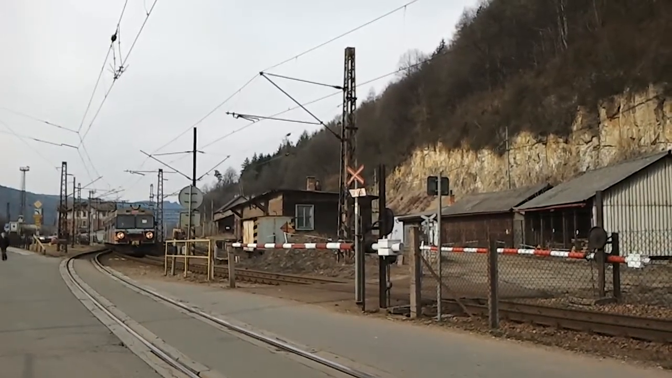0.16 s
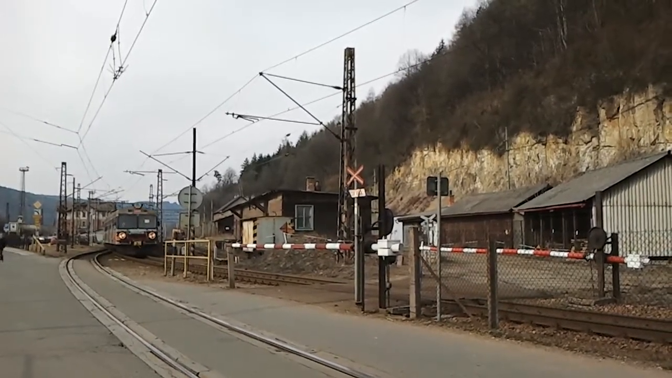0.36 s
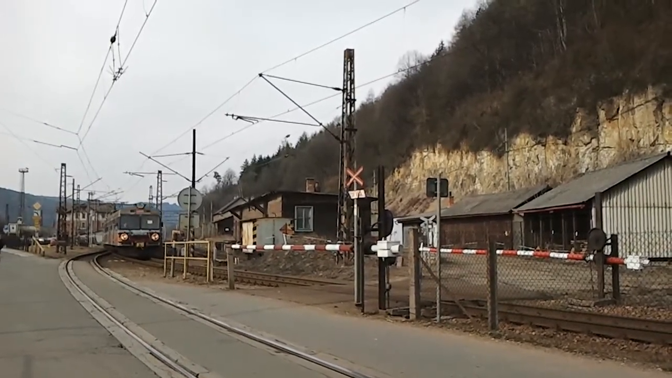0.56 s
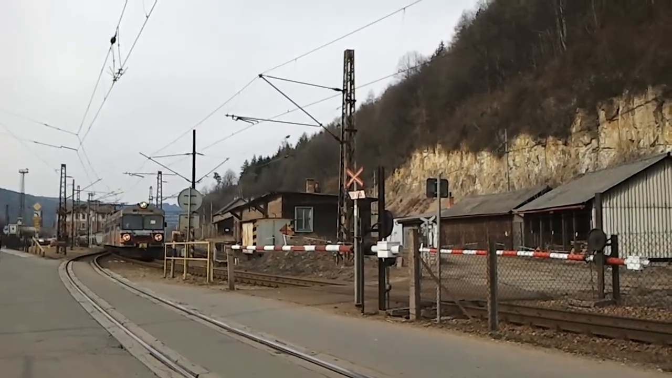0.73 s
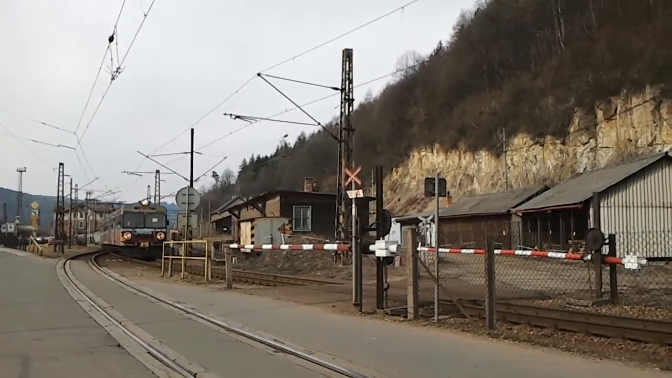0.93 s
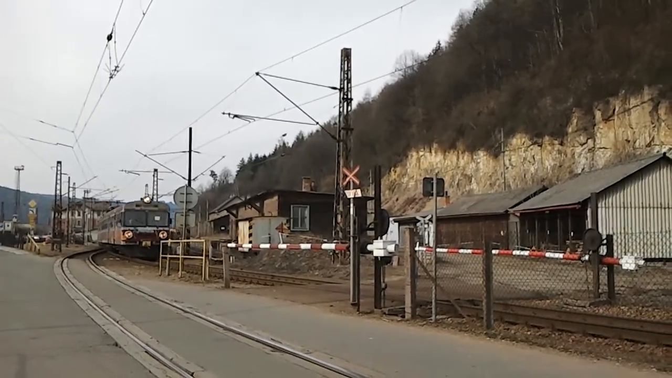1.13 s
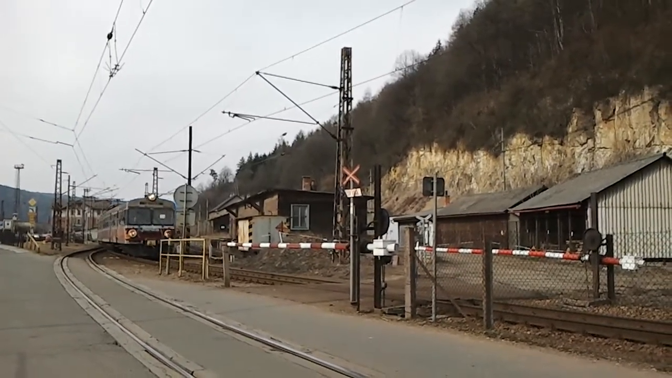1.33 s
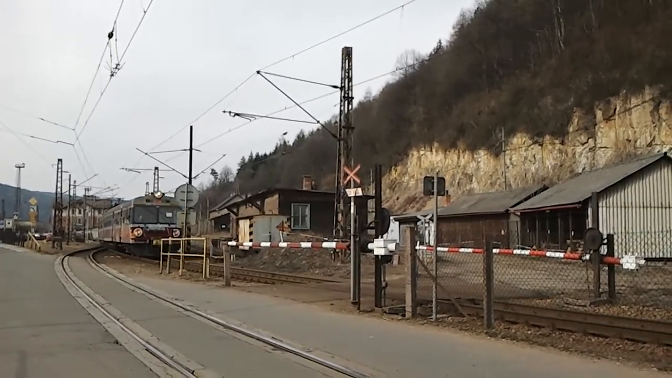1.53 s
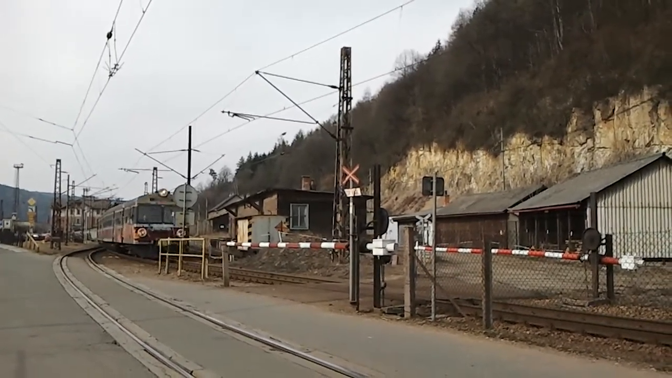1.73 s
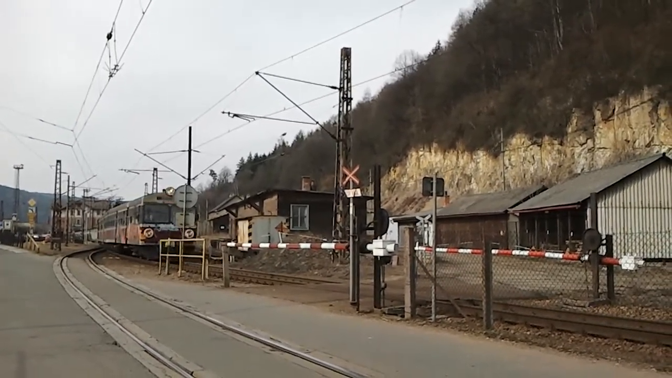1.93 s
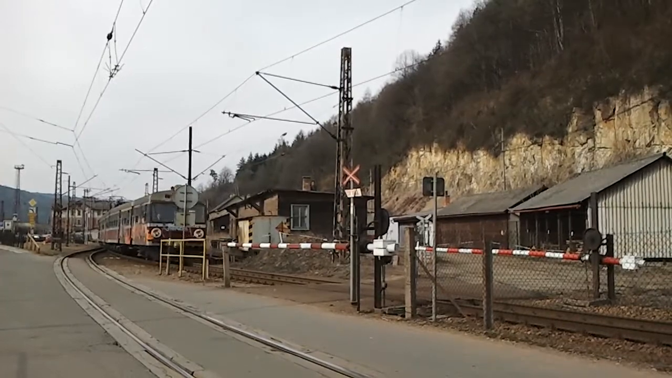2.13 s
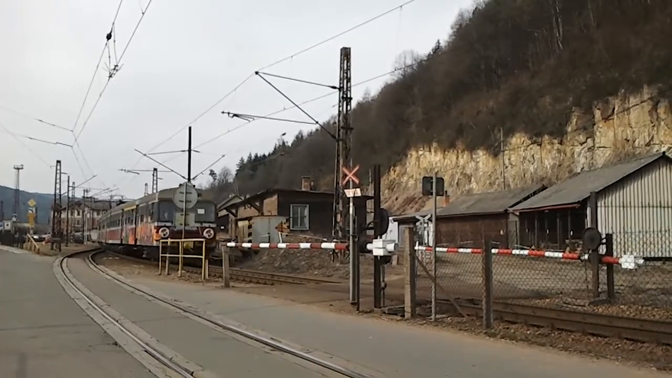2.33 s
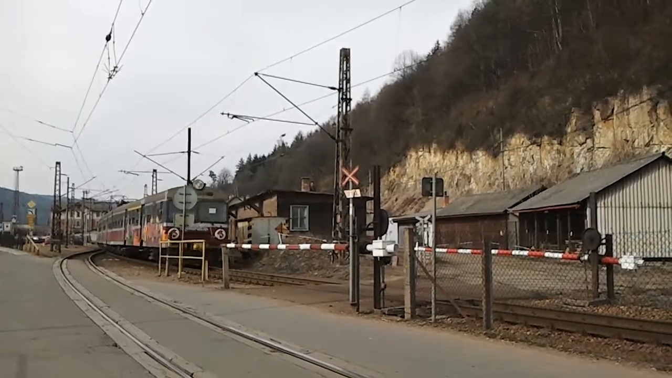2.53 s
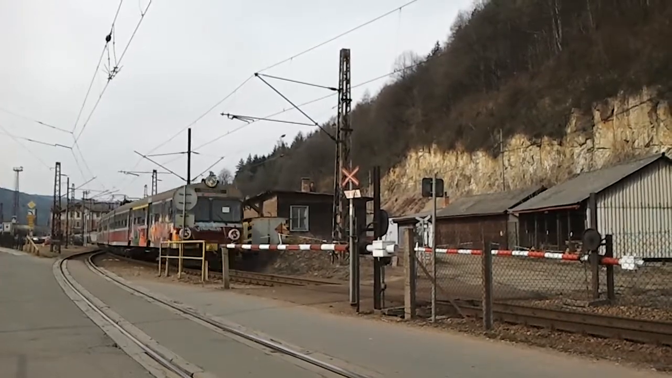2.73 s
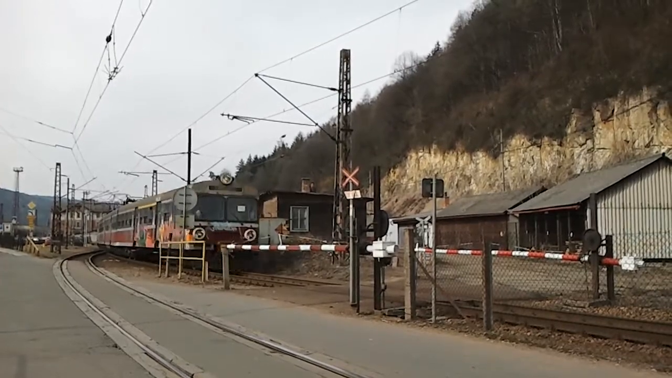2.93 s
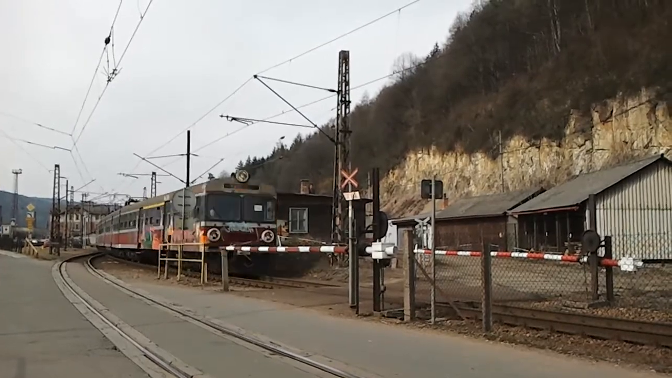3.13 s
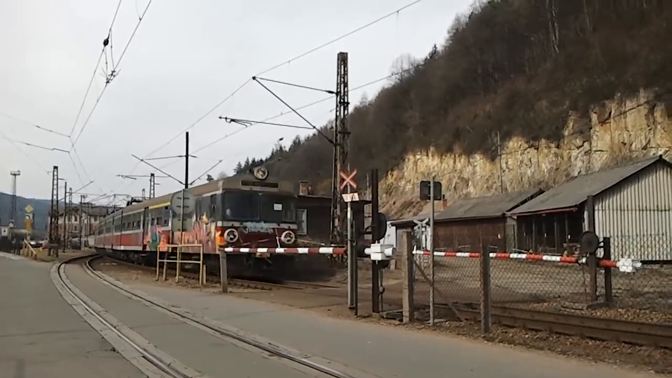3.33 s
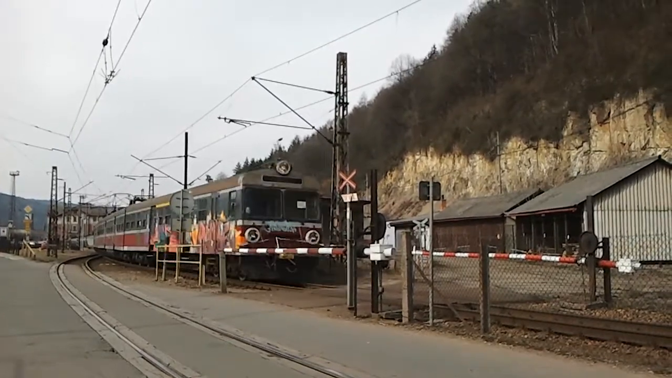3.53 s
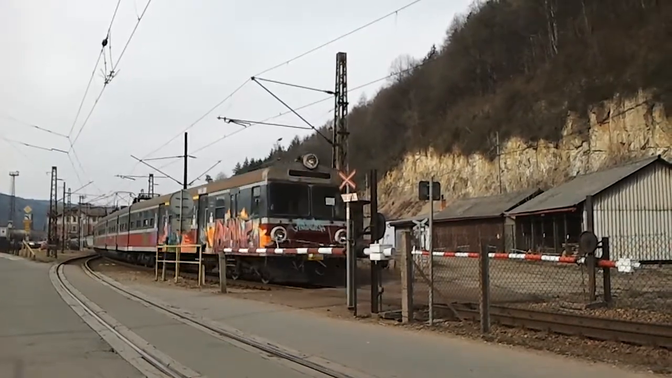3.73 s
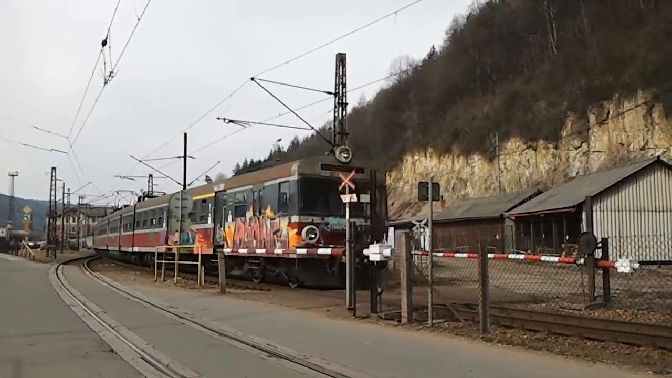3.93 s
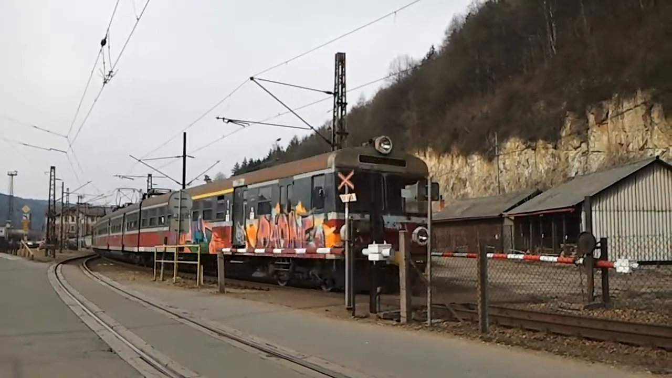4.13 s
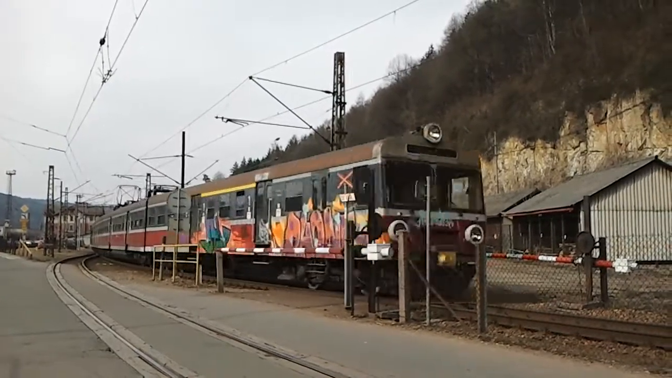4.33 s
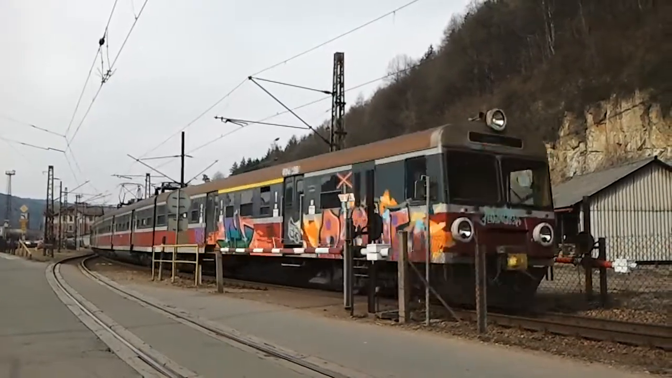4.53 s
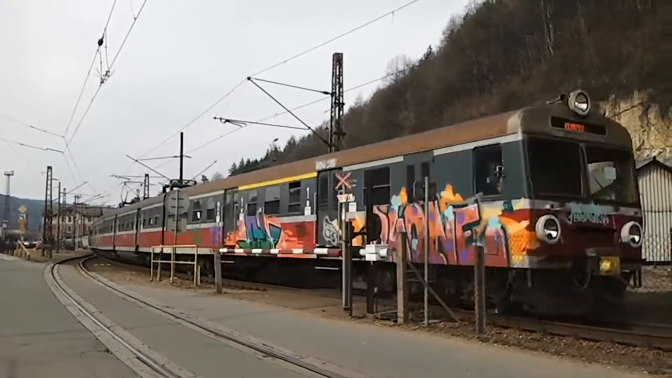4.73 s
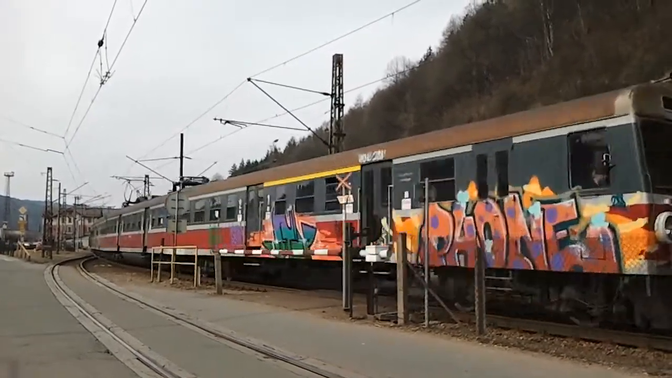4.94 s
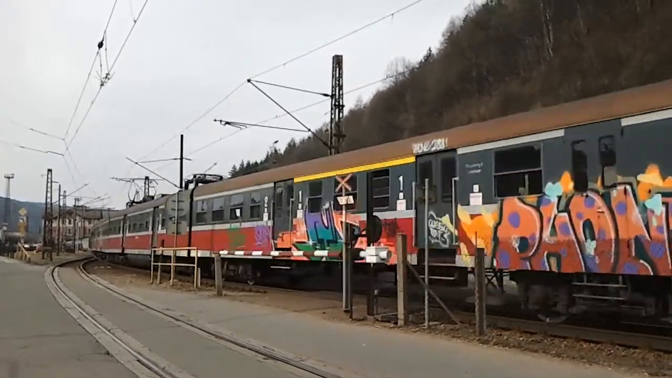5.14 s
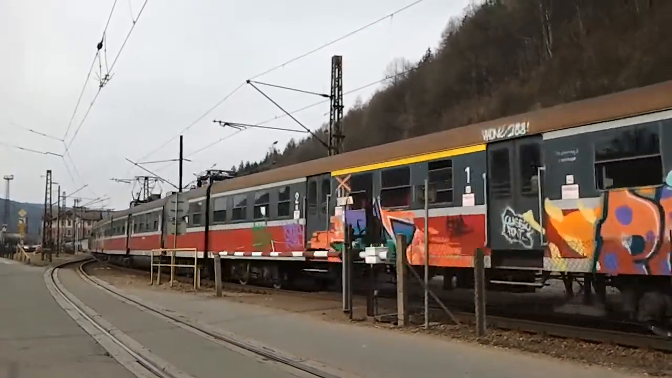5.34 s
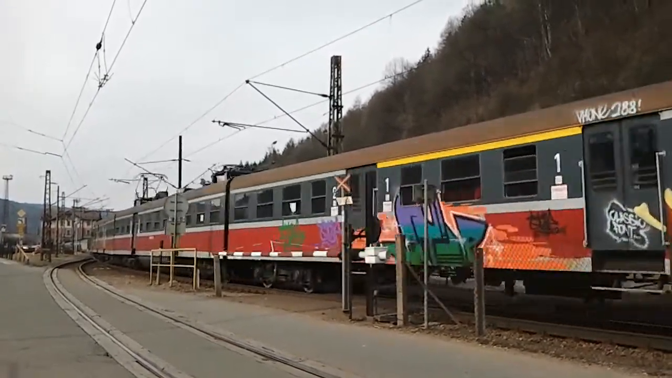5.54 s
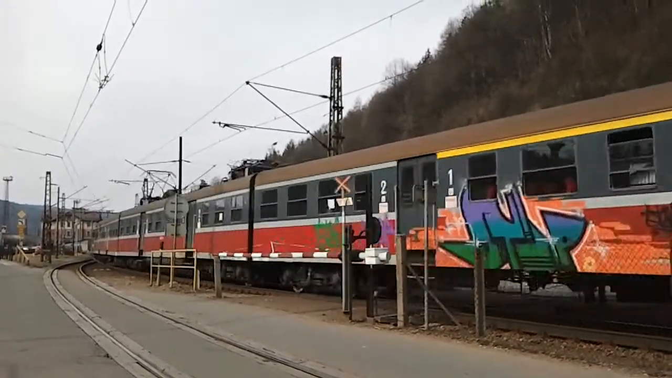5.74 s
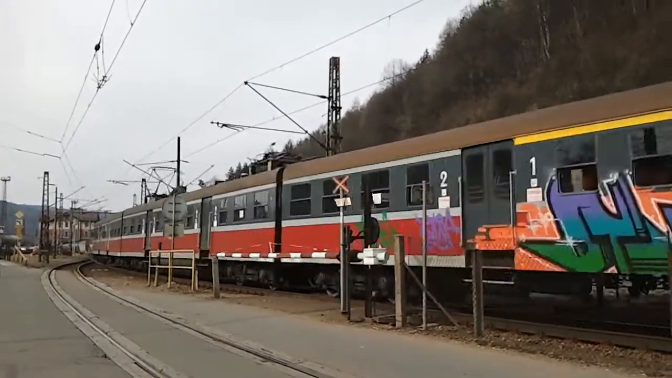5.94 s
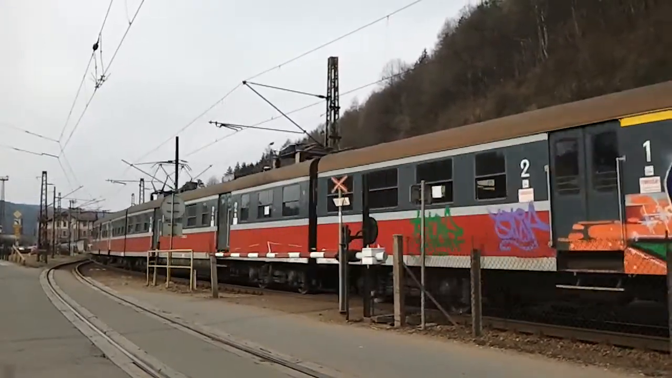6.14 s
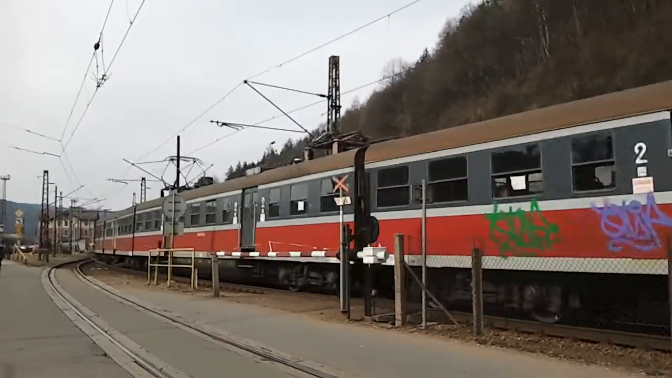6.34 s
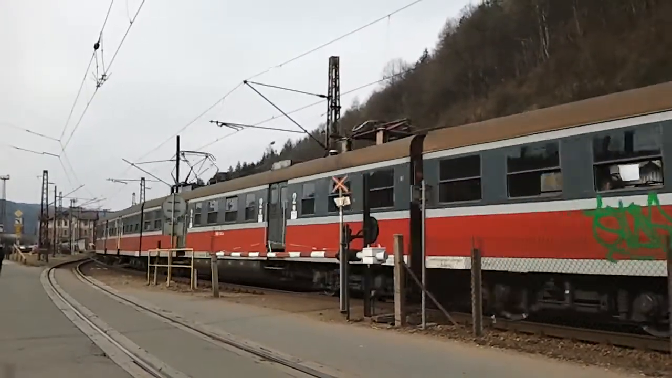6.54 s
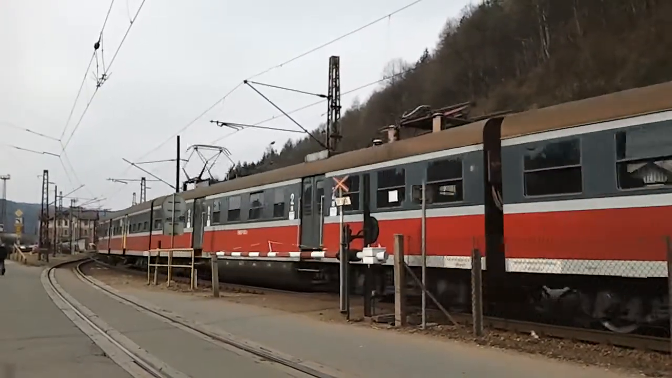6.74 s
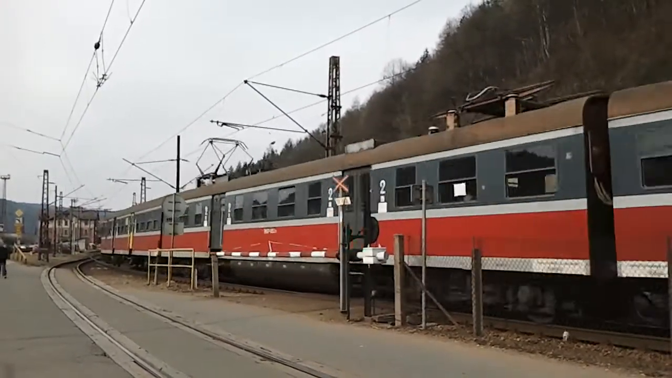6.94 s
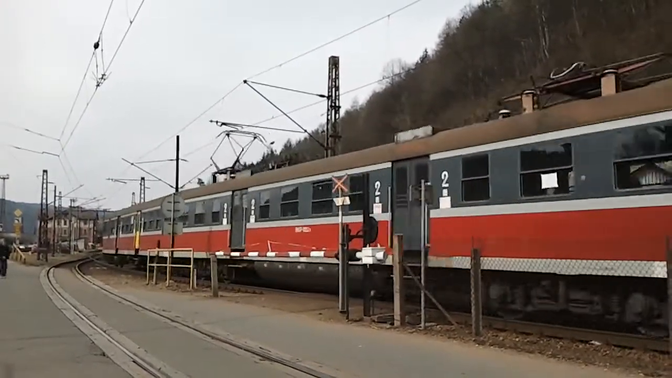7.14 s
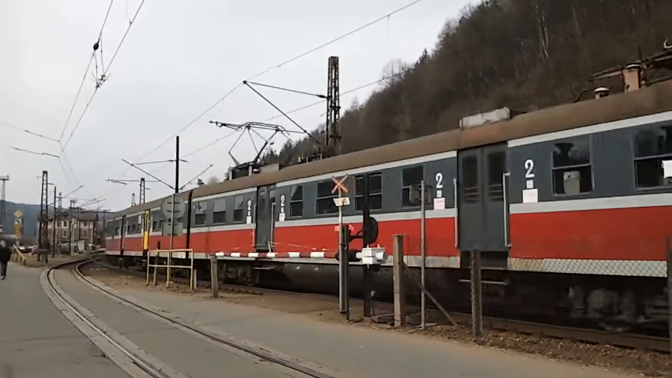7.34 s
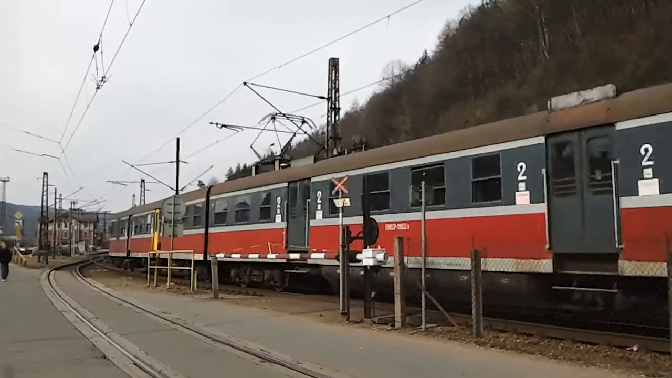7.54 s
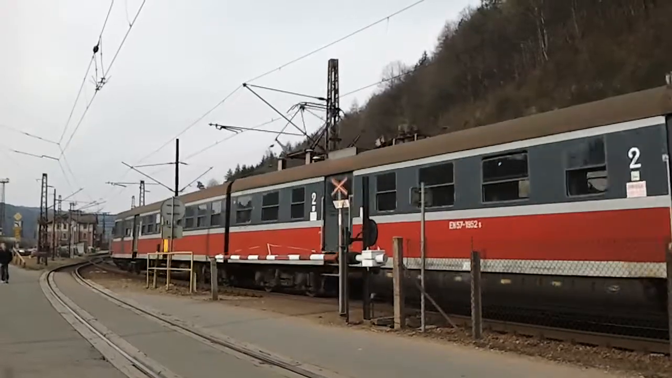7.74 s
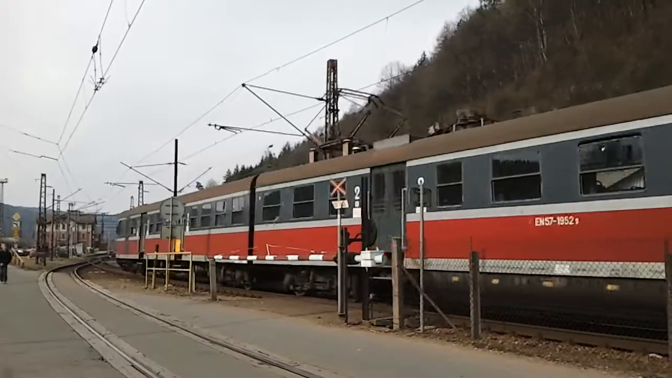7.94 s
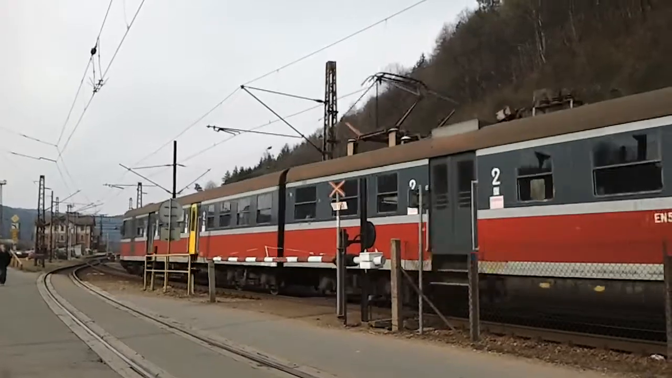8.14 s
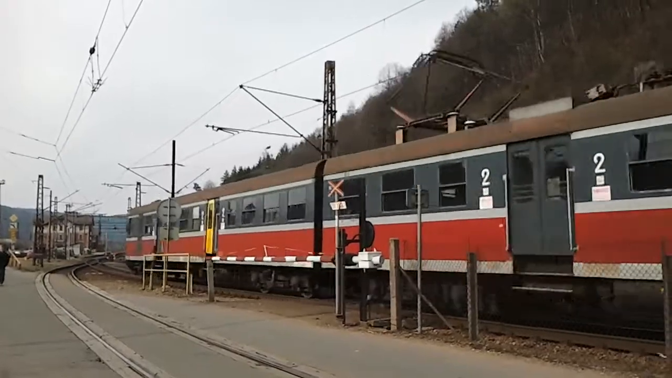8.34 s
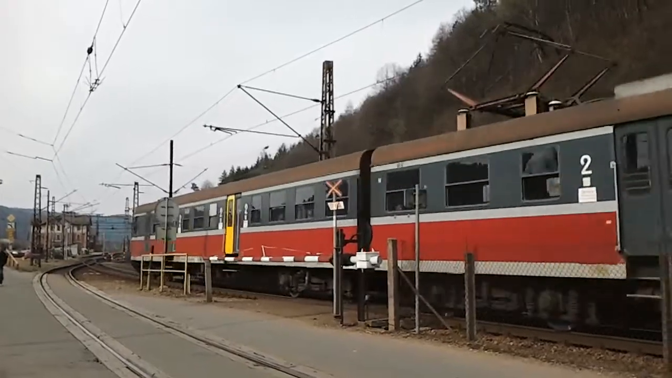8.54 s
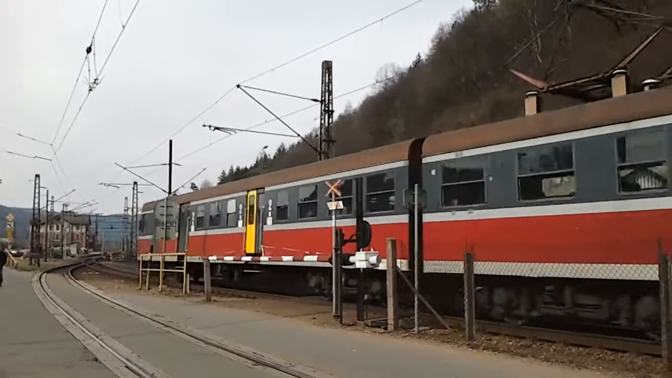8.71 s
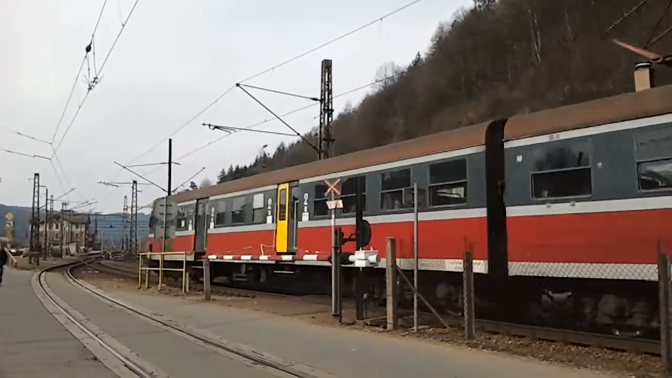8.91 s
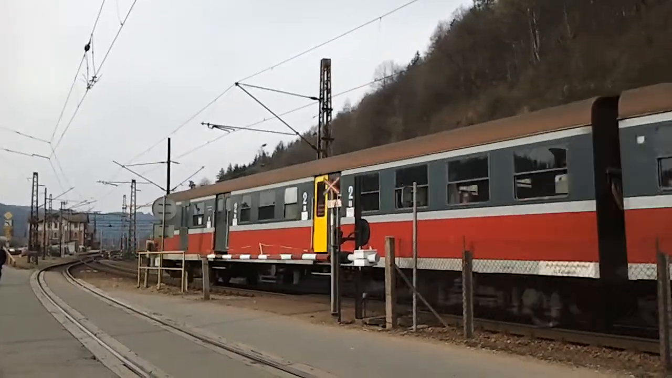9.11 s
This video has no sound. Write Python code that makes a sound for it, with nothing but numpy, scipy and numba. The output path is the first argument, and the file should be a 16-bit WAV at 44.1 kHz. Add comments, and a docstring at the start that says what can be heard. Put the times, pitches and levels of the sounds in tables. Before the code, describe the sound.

Wind buffets the microphone, a hand knocks the camera, then an electric train rumbles up and thunders past with humming rails and heavy wheel thumps.

```python
"""Level crossing beside a railway: an electric passenger train rolls up and runs past, a few metres off.
Roar: coloured noise and chance metal rings in five bands, from rough wheels and rails. Drone and hum:
noise resonances and wavering tones of vehicle and track modes. Thumps, clinks, ticks: decaying sines.
Clatter: noise bursts. Singing: narrow gliding noise, with short wide bursts at the loudest moments.
Wind and a fading hiss: shaped noise. One knock on the camera: a pressure dip, rebound and scrape."""
import sys
import numpy as np
from scipy import signal
from scipy.fft import rfft, irfft
from scipy.io import wavfile
from scipy.ndimage import uniform_filter1d
from numba import njit

SR = 44100
rng = np.random.default_rng(int(sys.argv[2]) if len(sys.argv) > 2 else 0)


def unload_audio(sound):
    """Save the sound as a 16-bit wav file, at the path given as the first command line argument."""
    columns = np.transpose(np.atleast_2d(sound))
    # keep every value between -1 and 1, then stretch to whole-number steps
    steps = np.round(np.clip(columns, -1, 1) * 32767)
    wavfile.write(sys.argv[1], SR, steps.astype(np.int16))


N = 404397
T = np.arange(N) / SR


def undb(db):
    """dB to gain."""
    return 10 ** (np.asarray(db) / 20)


def unit(x):
    """Scale to rms 1."""
    return x / np.sqrt(np.mean(x ** 2))


def columns(table):
    """Interpolate each column after t to one value per sample."""
    t_s, *rest = np.vstack(table).T
    return [np.interp(T, t_s, column) for column in rest]


def log_bins():
    """Log frequency of the spectrum bins."""
    return np.log(np.arange(N // 2 + 1) * SR / N + 1e-3)


def colour(points):
    """Spectrum of fresh noise shaped by (f/Hz, level/dB) points; -120 dB outside them."""
    hz, db = np.transpose(points)
    gain = undb(np.interp(log_bins(), np.log(hz), db, -120, -120))
    return rfft(rng.standard_normal(N)) * gain


def shaped_noise(points):
    """Coloured noise at rms 1."""
    return unit(irfft(colour(points), N))


def walk(rate_hz):
    """Random levels held 1 / rate, smoothed by two moving averages; rms 1."""
    k = int(SR / rate_hz)
    steps = np.repeat(rng.standard_normal(N // k + 1), k)
    return unit(uniform_filter1d(uniform_filter1d(steps, k), k)[:N])


@njit
def svf(x, hz, width):
    """State-variable band-pass with a moving centre, gain 1 at the centre."""
    y, band, low = np.empty(len(x)), 0., 0.
    for i in range(len(x)):
        g, k = np.tan(np.pi * hz[i] / SR), width / hz[i]
        v = (band + g * (x[i] - low)) / (1 + g * (g + k))
        band, low, y[i] = 2 * v - band, low + 2 * g * v, k * v
    return y


def resonance(hz, width_hz):
    """Noise through two band-passes in series, each width_hz wide, centred on hz per sample; rms 1."""
    width = 1. * width_hz
    once = svf(rng.standard_normal(len(hz)), hz, width)
    return unit(svf(once, hz, width))


def add(out, t_s, wave):
    """Mix a short sound in at t_s."""
    i = int(t_s * SR)
    out[i:i + len(wave)] += wave[:N - i]


def ring(db, hz, t60_s, rise_s):
    """One struck mode: sine-squared rise over a soft contact, then exponential decay."""
    t = np.arange(int((rise_s + t60_s) * SR)) / SR
    rise = np.sin(np.pi / 2 * np.minimum(t / rise_s, 1)) ** 2
    decay = 1000. ** (-np.maximum(t - rise_s, 0) / t60_s)
    return undb(db) * rise * decay * np.sin(2 * np.pi * (hz * t + rng.random()))


def bell(t_s, length_s):
    """Gaussian bump of height 1, length_s wide at 1/e."""
    return np.exp(-(2 * (T - t_s) / length_s) ** 2)


def swells(rows):
    """Gains of (t/s, level/dB .., length/s) rows: one bell per level column."""
    return sum(undb(db)[:, None] * bell(t, length) for t, *db, length in rows)


def bursts(rows, rise_s):
    """Envelope of (t/s, peak level/dB, t60/s) rows: linear rise, exponential fall."""
    return sum(undb(db) * np.clip((T - t) / rise_s, 0, 1) * 1000. ** (-np.maximum(T - t, 0) / t60)
               for t, db, t60 in rows)


# wind level before gusts: t/s, rms level/dB
WIND = [(0, -24), (.35, -26), (.9, -25), (1.7, -28), (2.3, -22.5), (2.58, -23), (2.9, -24.5), (3.15, -23.5),
        (3.6, -28.5), (4.45, -23), (4.7, -26), (5.7, -25.5), (6.3, -27), (7.2, -28), (8.1, -27),
        (8.35, -22), (8.75, -28.5), (9, -22), (9.17, -34)]
# wind spectrum shape: f/Hz, relative level/(dB per Hz)
WIND_COLOUR = [(12, -12.5), (25, 3.5), (34, -2.5), (50, -5), (90, -8.5), (200, -23.5), (400, -45.5)]


def wind():
    """Wind buffeting the microphone: low noise with random gusts."""
    gust_db = 2.2 * walk(6.)
    return shaped_noise(WIND_COLOUR) * undb(columns(WIND)[0] + gust_db)


# hiss level before flutter: t/s, rms level/dB
HISS = [(0.0, -61), (1.35, -60.5), (2.93, -66), (3.79, -67), (4.3, -73), (5.0, -76.5), (5.7, -83.5),
        (9.1, -88)]
# hiss and scrape spectrum shape: f/Hz, relative level/(dB per Hz)
HISS_COLOUR = [(3000, -15.5), (5000, -4.5), (7500, -3.5), (14200, -2.5), (14700, -28.5)]
# scrape around the knock: t/s, peak of rms envelope/dB, t60/s
SCRAPE = (1.178, -50, .2)


def hiss_and_scrape():
    """Fading hiss, and a hand scraping the camera: two envelopes on one bright noise."""
    hiss_gain = undb(columns(HISS)[0] + .8 * walk(7.))
    return shaped_noise(HISS_COLOUR) * (hiss_gain + bursts([SCRAPE], .012))


# dry ticks: t/s, peak level/dB, f/Hz, t60/s
TICKS = [(.597, -35, 8500, .001), (.612, -35, 6000, .001), (.624, -44, 6000, .001),
         (1.1903, -16, 2500, 0.002), (1.1916, -28, 5500, .003), (1.1915, -32, 9500, 0.002),
         (1.1917, -19, 1600, 0.0028), (1.2047, -19, 8000, 0.00068), (1.209, -25, 9500, .001),
         (5.238, -30.5, 3160, 0.015), ]


def ticks():
    """Dry ticks: very short decaying sines."""
    out = np.zeros(N)
    for t, db, hz, t60 in TICKS:
        add(out, t, ring(db, hz, t60, .0001))
    return out


# pressure dip before smoothing and high-pass: t/s, depth/dB, fall constant/s, return constant/s
KNOCK = (1.1913, 3, .0008, .0019)
# housing springing back: level/dB re dip, delay/s, length/s
REBOUND = (-19, .011, .016)


def camera_knock():
    """Knock on the camera: a sharp pressure dip, then the housing springs back."""
    t, depth_db, fall_s, return_s = KNOCK
    rebound_db, delay_s, length_s = REBOUND
    dip = np.exp(-np.abs(T - t) / np.where(T < t, fall_s, return_s))
    dip = uniform_filter1d(dip, size=28)
    dip = dip - undb(rebound_db) * bell(t + delay_s, length_s)
    # no steady pressure passes the microphone: slow overshoot after the dip
    b, a = signal.butter(1, 16., "high", fs=SR)
    return -undb(depth_db) * signal.lfilter(b, a, dip)


# distant clinks of metal: t/s, nominal level/dB (each mode 4.5 dB below), centre f/Hz, t60/s
CLINKS = [(.39, -29, 720, 0.14), (.1, -41, 755, .08), (.3, -37.5, 1300, .08), (.37, -40, 1080, .08),
          (.39, -25, 380, .12), (.58, -22, 180, .12), (0.736, -30.5, 1450, 0.065), (.73, -38, 1180, .07),
          (.8, -21, 195, .12), (1.6, -19, 171, .15), (1.839, -19, 172, 0.14), (1.84, -22, 273, .1),
          (2.7, -35, 1440, .08), (4.03, -35, 1370, .12), (4.28, -27, 1430, .12), (6.17, -19, 365, .15),
          (6.36, -18, 375, .15), (6.691, -13.5, 492, 0.11), (2.739, -21.5, 322, 0.15),
          (3.10, -15.5, 342, 0.18)]
CLINK_SPREAD = .025  # mode spacing / centre f


def clinks():
    """Distant metal clinks: three close, randomly detuned modes each."""
    out = np.zeros(N)
    for t, db, hz, t60 in CLINKS:
        for step in CLINK_SPREAD * (np.arange(-1, 2) + 0.26 * rng.standard_normal(3)):
            add(out, t, ring(db - 4.5, hz * (1 + step), t60, 0.015))
    return out


# distant wheels over the points: t/s, peak of rms envelope/dB
CLATTER = [(2.149, -33), (2.662, -31), (2.766, -31), (2.939, -26), (3.169, -28.5), (3.302, -24),
           (3.851, -20.5), (5.944, -23), (7.179, -23), (7.71, -21), (7.839, -23)]
# clatter spectrum shape: f/Hz, relative level/(dB per Hz)
CLATTER_COLOUR = [(250, -29.5), (330, 10.5), (500, -5.5), (570, -1.5), (750, 2), (900, -5), (1300, -29.5),
                  (2500, -62)]
CLATTER_T60_S = 0.24


def clatter():
    """Distant wheels clattering over the points: decaying bursts of coloured noise."""
    rows = [(t, db, CLATTER_T60_S) for t, db in CLATTER]
    return shaped_noise(CLATTER_COLOUR) * bursts(rows, 0.002)


# singing, and short wide bursts of bright noise at the loudest moments: start t/s, end t/s,
# start f/Hz, end f/Hz, width per filter/Hz, mid-span rms level before flicker/dB
SINGING = [(3.95, 4.2, 1370, 1370, 30, -45), (4.2, 4.7, 1430, 1420, 60, -46),
           (4.4, 5.5, 1950, 1960, 70, -50), (3.85, 4.5, 2700, 2700, 45, -56),
           (4.65, 5.0, 2690, 2700, 45, -55), (4.0, 4.45, 4480, 4490, 120, -70),
           (5.0, 5.5, 2750, 2700, 150, -54), (6.0, 6.45, 4100, 4200, 200, -62),
           (8.1, 8.8, 2350, 2400, 80, -53), (6.7, 7.1, 4550, 4620, 90, -63),
           (5.9, 6.2, 3750, 3720, 50, -60), (4.17, 4.36, 3570, 3560, 20, -60),
           (4.55, 5.3, 3540, 3500, 90, -60), (4.2, 4.38, 2450, 2450, 25, -58),
           (4.75, 4.9, 2420, 2420, 20, -56), (4.45, 4.92, 11800, 11800, 500, -73),
           (5.18, 5.32, 3200, 3190, 40, -55), (5.35, 5.52, 3810, 3790, 50, -59),
           (5.4, 5.65, 2710, 2670, 40, -50), (5.5, 5.9, 2380, 2360, 60, -52),
           (5.5, 6.05, 4460, 4510, 60, -63), (6.25, 6.55, 2750, 2800, 120, -52),
           (6.62, 6.8, 1250, 1250, 300, -38), (6.9, 7.3, 2650, 2600, 200, -50),
           (7.22, 7.36, 3140, 3150, 25, -55), (7.68, 7.82, 4400, 4390, 50, -60),
           (7.3, 8.2, 4420, 4380, 140, -62), (7.72, 8.32, 2710, 2650, 130, -49),
           (8.12, 8.28, 3480, 3480, 50, -56), (8.45, 8.6, 3170, 3160, 25, -56),
           (6.65, 6.67, 7500, 7500, 3000, -62), (6.96, 7.0, 7300, 7300, 2500, -60),
           (7.235, 7.27, 7300, 7300, 3500, -59), (7.76, 7.8, 6500, 6500, 2500, -60),
           (8.45, 9.0, 4320, 4230, 160, -61), (8.7, 9.12, 2700, 2720, 200, -51),
           (9.05, 9.17, 4230, 4220, 30, -59)]
SINGING_DRIFT_HZ, SINGING_FLICKER_DB = 10, 0.99  # rms


def singing():
    """Rails and wheels singing, and short wide bright bursts: gliding noise bands, shared drift and flicker."""
    out = np.zeros(N)
    drift, flicker = walk(6.7), walk(19)
    for start, end, hz, end_hz, width, db in SINGING:
        span = (T >= start) & (T < end)
        part = (T[span] - start) / (end - start)
        centre_hz = hz + (end_hz - hz) * part + SINGING_DRIFT_HZ * drift[span]
        fade = np.sqrt(np.sin(np.pi * part))
        gain = undb(db + SINGING_FLICKER_DB * flicker[span])
        out[span] += resonance(centre_hz, width) * fade * gain
    return out


# axles over rail joints: t/s, peak level/dB, f/Hz
THUMPS = [(4.649, -13, 247), (5.152, -8, 254), (5.228, 2.5, 255), (5.294, -9, 216), (5.564, -9, 228),
          (6.512, -5, 226), (6.652, -0.5, 245), (6.781, -15, 228), (7.205, -4.5, 227), (7.494, -3.5, 238),
          (7.777, -13, 274), (8.052, -2.5, 213), (8.298, -7.5, 215), (8.744, -5.5, 243), (8.857, -6, 259)]
THUMP_RISE_S, THUMP_T60_S = 0.0086, 0.051


def thumps():
    """Axles over rail joints: each blow rings one low mode."""
    out = np.zeros(N)
    for t, db, hz in THUMPS:
        add(out, t, ring(db, hz, THUMP_T60_S, THUMP_RISE_S))
    return out


# base rumble: t/s, car-body rms level/dB, bogie rms level/dB
DRONE = [(0, -40, -36), (.65, -32, -37.5), (1.2, -45, -37.5), (1.75, -29, -29), (2.5, -35, -32),
         (3.4, -31.5, -33.5), (4.1, -35, -26), (5.1, -29.5, -23.5), (5.6, -23, -24), (6.2, -24.5, -26.5),
         (7.1, -24, -26), (7.6, -19.5, -23.5), (8.2, -24.5, -27), (9.17, -20, -26.5)]
# car-body and bogie modes: f/Hz, width per filter/Hz
DRONE_MODES = [(125, 37), (172, 62)]
# brief rumble swells, power-summed: t/s, car-body level/dB, bogie level/dB, length/s
BOOMS = [(0.693, -25.5, -44, 0.08), (0.808, -42, -29, .08), (3.71, -38, -28, .08), (3.885, -30, -19, 0.08),
         (4.632, -29, -31, 0.077), (5.337, -20.5, -26, .14), (5.963, -17, -32, 0.081),
         (6.07, -33, -18, 0.11), (6.438, -20.5, -17, 0.17), (7.444, -15.5, -29, 0.092),
         (7.552, -28, -29, 0.059), (7.84, -16.5, -26.5, 0.26), (8.37, -22, -31, 0.089),
         (8.615, -21.5, -28, 0.089), (8.913, -27, -21, 0.09)]


def drone():
    """Roughness drives low car-body and bogie modes: two noise resonances with swells."""
    out = 0
    for (hz, width), db, boom in zip(DRONE_MODES, columns(DRONE), swells(BOOMS)):
        out = out + resonance(hz + 0 * T, width) * np.hypot(undb(db), boom)
    return out


# base hum before throb and dips: t/s, lower mode rms level/dB, upper mode rms level/dB
HUM = [(0, -47, -38.5), (0.6, -35.5, -39), (1.2, -37.5, -43), (1.8, -37, -35.5), (2.4, -32.5, -34),
       (3, -29, -23.5), (3.6, -24, -35), (4.1, -22, -24), (4.6, -23, -20.5), (5.1, -21.5, -26),
       (5.6, -16.5, -19.5), (6.1, -26.5, -29.5), (6.6, -15.5, -28), (7.1, -21, -20.5), (7.6, -16.5, -19.5),
       (8.1, -20.5, -16), (8.35, -24, -15), (8.5, -22, -14), (8.8, -24, -14.5), (9.17, -28.5, -15)]
# lower and upper mode: tone wander/Hz rms, fringe width per filter/Hz
HUM_MODES = [(4.5, 34), (3, 44)]
# mode pitch: t/s, lower f/Hz, upper f/Hz
HUM_HZ = [(0, 222, 250), (3.3, 226, 245), (4.4, 222, 250), (5.2, 225, 260), (5.6, 220, 252),
          (6.1, 217, 250), (6.6, 229, 256), (6.85, 223, 256), (7.3, 214, 258), (7.6, 213, 262),
          (8.1, 213, 260), (8.36, 215, 260), (8.42, 222, 247), (8.6, 222, 243), (8.76, 222, 245),
          (8.87, 220, 265), (9, 220, 261), (9.17, 220, 257)]
# fringe re tone once clear: t/s, lower level/dB, upper level/dB
HUM_ROUGH = [(4.2, -3, -2), (5.8, -3, 0), (6.4, -4, 2), (6.65, -9, -3), (6.9, -6, -3), (7.2, -4, 3),
             (7.5, -6, 3), (7.62, -8, -5), (7.85, 1, 0), (8.28, 2, 2), (8.38, 4, -12), (8.76, 4, -11),
             (8.85, 4, 3), (8.97, 4, 0), (9.03, 4, -9), (9.17, 4, -7)]
# tones emerge from the fringe: start t/s, end t/s
HUM_CLEARS_S = (2.3, 4.7)
# brief hum swells, power-summed, before dips: t/s, lower level/dB, upper level/dB, length/s
SWELLS = [(2.21, -30, -30, 0.23), (2.752, -23, -25, 0.12), (3.14, -17, -25, 0.062),
          (3.33, -21.5, -21.5, 0.11), (3.826, -19, -29, 0.072), (4.053, -14.5, -12.5, 0.052),
          (4.341, -28, -16.5, 0.075), (4.508, -19, -24, 0.025), (5.178, -27, -11, 0.057),
          (5.57, -22, -17, 0.047), (5.696, -16, -13, 0.067), (5.894, -16, -30, 0.055),
          (6.095, -15.5, -20, 0.05), (6.248, -14.5, -25, 0.09), (6.62, -7.5, -14, 0.037),
          (6.724, -6.5, -22.5, 0.074), (6.802, -8.5, -32, 0.055), (6.97, -11.5, -10, 0.043),
          (7.06, -18.5, -14, .03), (7.098, -16.5, -12.5, 0.03), (7.62, -12, -11.5, 0.091),
          (7.789, -23, -6.5, 0.024), (8.179, -9.5, -15, 0.024), (8.447, -25.5, -11, 0.071),
          (9.042, -31, -10, 0.073)]
# brief hum dips: t/s, gain/dB, length/s
DIPS = [(2.898, -12, 0.035), (3.035, -7.5, 0.08), (3.412, -7, 0.045), (3.517, -10, 0.038),
        (3.963, -7, 0.12), (4.22, -14, 0.062), (4.75, -2.5, 0.13), (5.655, -16, 0.04), (6.64, -9.5, 0.018),
        (6.887, -6, 0.051), (7.01, -10, 0.027), (7.138, -5.5, 0.075), (7.718, -5.5, 0.079),
        (8.003, -7, 0.069), (8.256, -9, 0.12)]
HUM_THROB_DB, HUM_THROBS_PER_S = 1.5, 13  # rms depth, random steps


def hum():
    """Rail-head ripples drive two close track modes: wavering tones that beat, each with a rough fringe."""
    clear, out = np.interp(T, HUM_CLEARS_S, [0, 1]), 0
    modes = zip(HUM_MODES, columns(HUM_HZ), columns(HUM), swells(SWELLS), columns(HUM_ROUGH))
    for (wander, width), hz, db, swell, rough in modes:
        fringe = 1 + clear * (undb(rough) - 1)
        phase = 2 * np.pi * np.cumsum(hz + wander * walk(14)) / SR
        tone = np.sqrt(2) * np.sin(phase)
        gain = np.hypot(undb(db + HUM_THROB_DB * walk(HUM_THROBS_PER_S)), swell)
        mix = clear * tone + fringe * resonance(hz, width)
        out = out + gain * mix / np.hypot(clear, fringe)
    dip_db = sum(db * bell(t, length) for t, db, length in DIPS)
    return out * undb(dip_db)


# near spectrum shape, for rings and roar: f/Hz, relative level/(dB per Hz)
NEAR_COLOUR = [(170, -35), (290, 4), (307, -4), (365, 1), (421, -6), (494, -6.5), (554, -12.5), (658, -15),
               (1060, -26), (1400, -27.5), (1750, -32.5), (2000, -30.5), (2150, -37), (2380, -33),
               (2520, -35), (2690, -29.5), (2900, -32.5), (3150, -37), (3350, -37.5), (3910, -44.5),
               (4450, -46.5), (5500, -53), (7300, -61), (8300, -70.5), (9000, -74), (11700, -99),
               (19800, -120)]
RINGS_PER_S, RING_T60_S = 150, .16


def rings():
    """Spectrum of chance blows on wheels and rails, each ringing one mode, in the near colour."""
    out = np.zeros(N)
    for when, pitch, size in rng.random((int(RINGS_PER_S * N / SR), 3)):
        hz = 300 * 16 ** pitch
        add(out, when * N / SR, ring(10 * np.log10(hz) + 6 * size, hz, RING_T60_S, 0.0088))
    hz, db = np.transpose(NEAR_COLOUR)
    return rfft(unit(out)) * undb(np.interp(log_bins(), np.log(hz), db))


# roar before split, surge and flutter: t/s, then rms level/dB of body, rail ring, wheel ring, top
ROAR = [(0, -42, -48, -63.5, -67), (0.6, -35, -47.5, -56.5, -65), (1.2, -36, -49, -55.5, -67.5),
        (1.8, -36.5, -44.5, -57, -64), (2.4, -32, -43.5, -53.5, -64), (3, -32, -44, -56, -68.5),
        (3.6, -29, -44, -52, -66), (4.1, -28, -38.5, -48.5, -64.5), (4.6, -22.5, -37.5, -50.5, -62),
        (5.1, -23, -36, -49, -56.5), (5.6, -22.5, -35.5, -45, -53), (6.1, -18.5, -36.5, -45.5, -57.5),
        (6.6, -18.5, -36.5, -48, -57), (7.1, -22, -36, -45, -53.5), (7.6, -21, -37.5, -46.5, -55),
        (8.1, -21, -38, -47, -55.5), (8.6, -21.5, -35.5, -47, -55), (9.17, -24.5, -37, -45.5, -55)]
# body parts re the body column: t/s, lower level/dB, upper level/dB
BODY_SPLIT = [(0, -3.5, -4), (.8, -4.5, -4.5), (1.4, -3.5, -7.5), (1.9, 3, -5.5), (2.5, -2.5, -5.5),
              (3.1, -3, -5), (3.7, 0, -5), (4.3, -2.5, -7.5), (5, 0, -5), (5.7, -1.5, -6.5),
              (6.4, -3.5, -7.5), (7, -1.5, -4.5), (7.6, 0, -5), (8.3, -1, -6.5), (9.17, 0, -5)]
# band centres, lower body, upper body, rail ring, wheel ring, top: f/Hz
ROAR_HZ = [350, 750, 1500, 2800, 5000]
# brief swells and dips of the roar, before the band share: t/s, level/dB, length/s
SURGES = [(4.04, 6, 0.092), (4.19, 0.5, 0.16), (5.008, 2, 0.054), (5.198, 0.5, .12), (5.804, -2.5, .2),
          (6.04, 2, .08), (6.103, -2, 0.055), (6.197, 4.5, 0.094), (6.384, 5, 0.17), (6.47, -2, 0.068),
          (6.692, 4, .1), (6.805, -2, 0.22), (6.994, 3.5, .1), (7.314, 1, .05), (7.365, -4.5, 0.043),
          (7.425, 3.5, 0.066), (7.638, -3.5, 0.11), (7.867, -1.5, 0.054), (8.12, 2, .06), (8.38, 3, .1)]
# share of the surge dB taken by each band [ratio]
SURGE_SHARE = [0.65, 0.69, 0.11, .15, .05]
# spectrum shape down the track, with ground-echo dips: f/Hz, relative level/(dB per Hz)
FAR_COLOUR = [(170, -31.5), (290, -3), (345, 0), (434, -8), (473, -6.5), (560, -18), (760, -16),
              (956, -24.5), (1270, -29.5), (1720, -30), (2000, -32.5), (2200, -39), (2550, -37),
              (2750, -37), (3100, -40.5), (3350, -49.5), (3750, -51.5), (9000, -68.5)]
# far-to-near crossfade: start t/s, end t/s
ARRIVES_S = (3.7, 5.23)
RING_DB = -17  # gain of rings added to the near noise


def roar():
    """Wheel and rail roughness: five overlapping noise bands, far colour fading to near."""
    near = np.interp(T, ARRIVES_S, [0, 1])
    far_noise = colour(FAR_COLOUR)
    near_noise = colour(NEAR_COLOUR) + undb(RING_DB) * rings()
    surge_db = sum(db * bell(t, length) for t, db, length in SURGES)
    body, *higher = columns(ROAR)
    levels = [body + part for part in columns(BODY_SPLIT)] + higher
    log_hz, out = log_bins(), 0
    for k, db in enumerate(levels):
        share = np.interp(log_hz, np.log(ROAR_HZ), np.eye(len(ROAR_HZ))[k])
        far = unit(irfft(far_noise * share, N))
        close = unit(irfft(near_noise * share, N))
        band = np.sqrt(1 - near) * far + np.sqrt(near) * close
        out = out + band * undb(db + SURGE_SHARE[k] * surge_db + 1.2 * walk(8))
    return out


def scene():
    """Sum of all sources at one microphone."""
    background = wind() + hiss_and_scrape() + ticks() + camera_knock()
    train = clinks() + clatter() + singing() + thumps() + drone() + hum() + roar()
    return (background + train)[None, :]


KNEE, CEILING = .7, .95  # absolute sample level
TOP_HZ = 14600


def record(dry):
    """Camera input: tanh rounding of peaks above the knee, then a steep low-pass."""
    over, room = np.maximum(np.abs(dry) - KNEE, 0), CEILING - KNEE
    rounded = np.sign(dry) * (np.abs(dry) - over + room * np.tanh(over / room))
    return signal.sosfilt(signal.ellip(8, .2, 70, TOP_HZ, fs=SR, output="sos"), rounded)


dry = scene()
out = record(dry)
unload_audio(out)
```